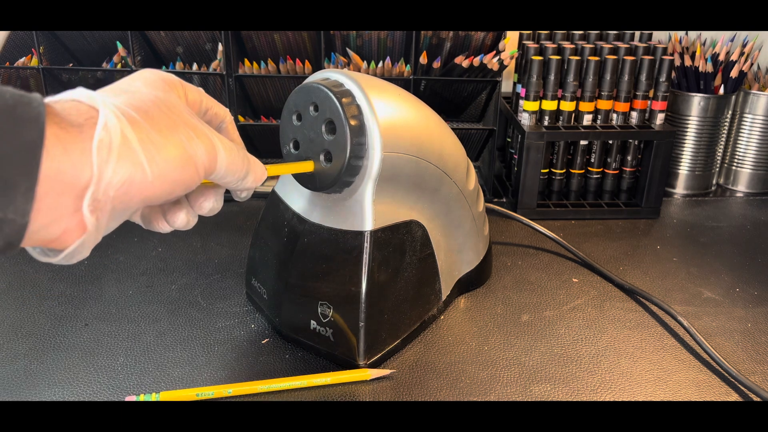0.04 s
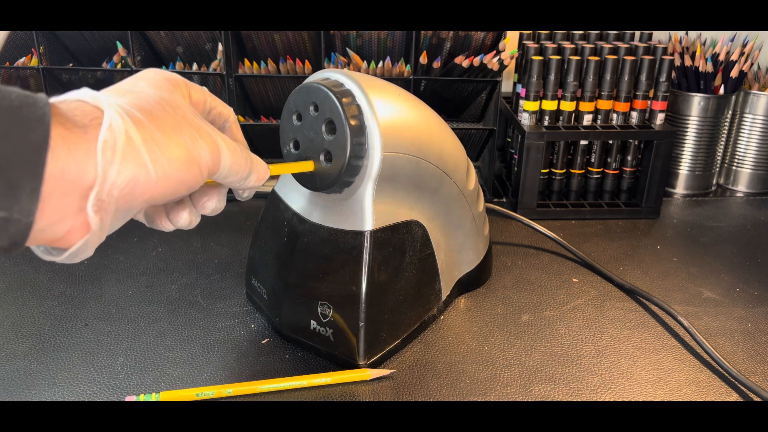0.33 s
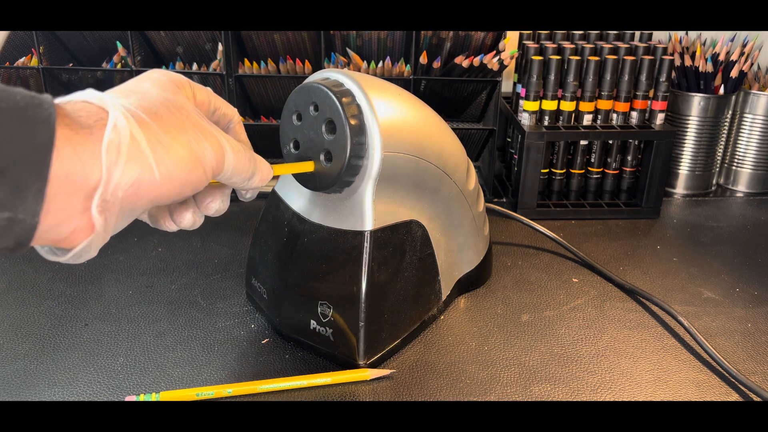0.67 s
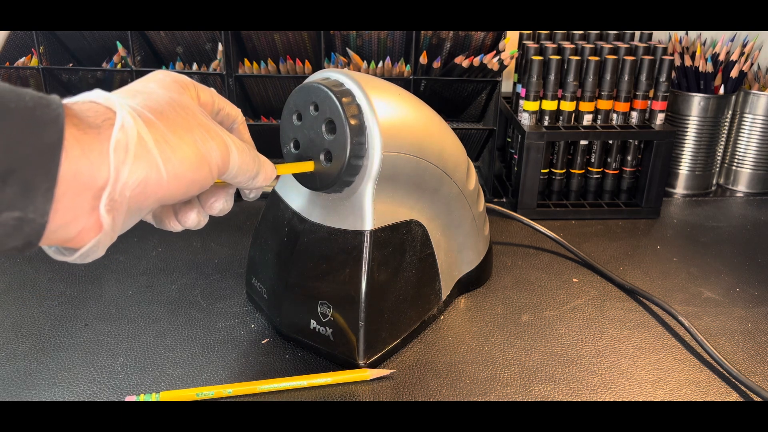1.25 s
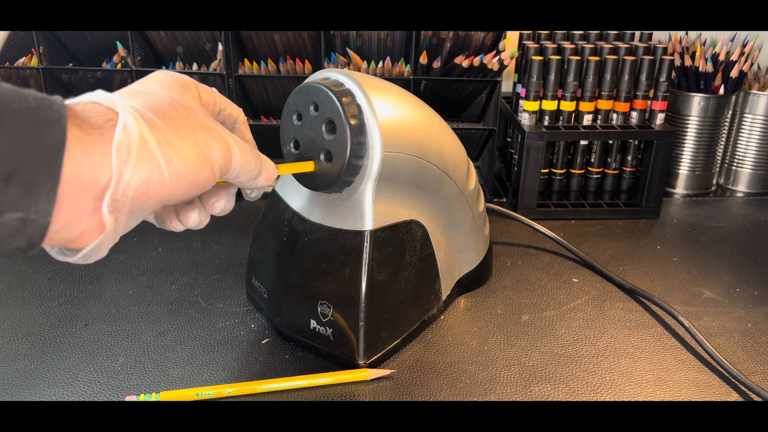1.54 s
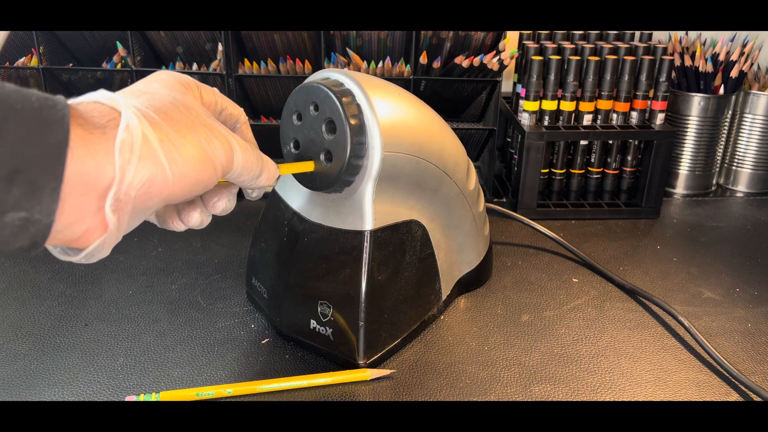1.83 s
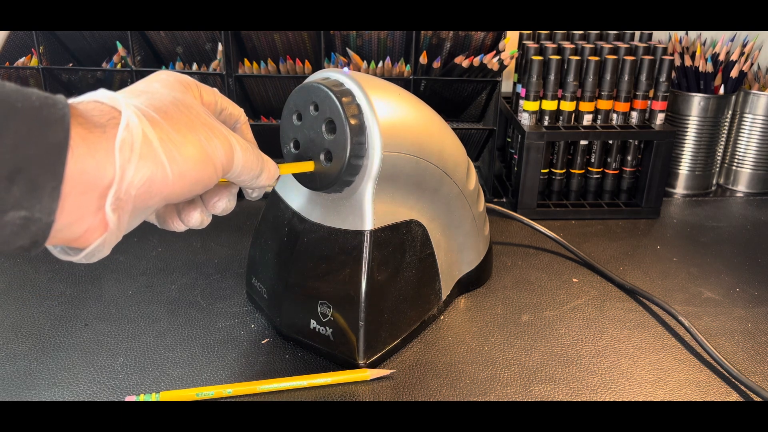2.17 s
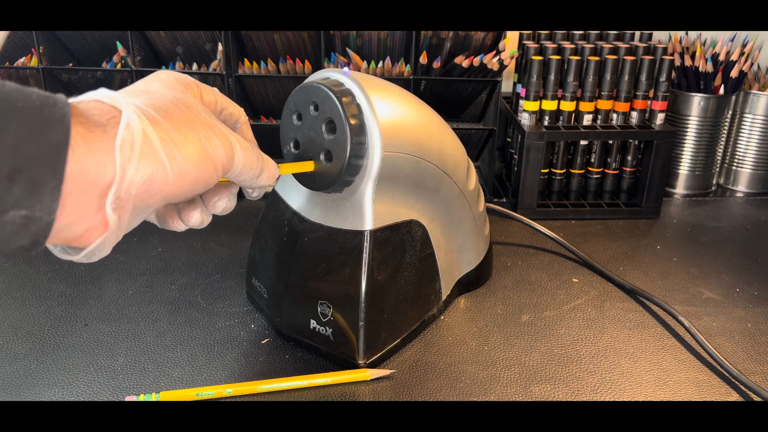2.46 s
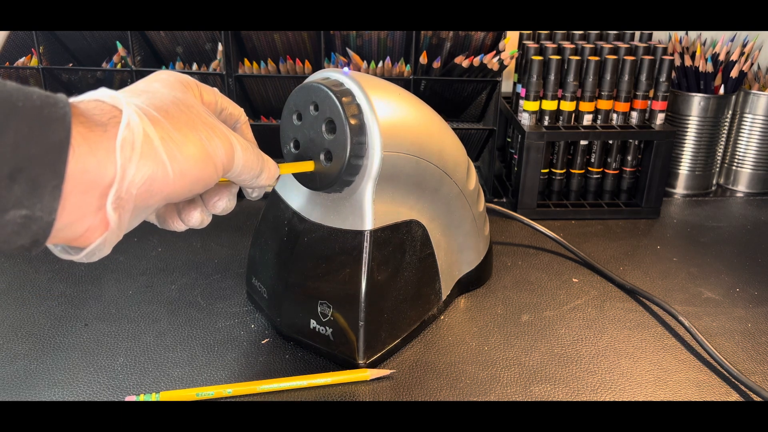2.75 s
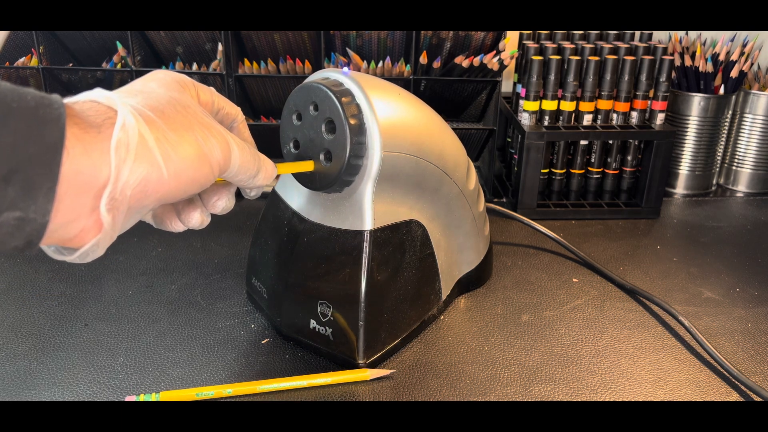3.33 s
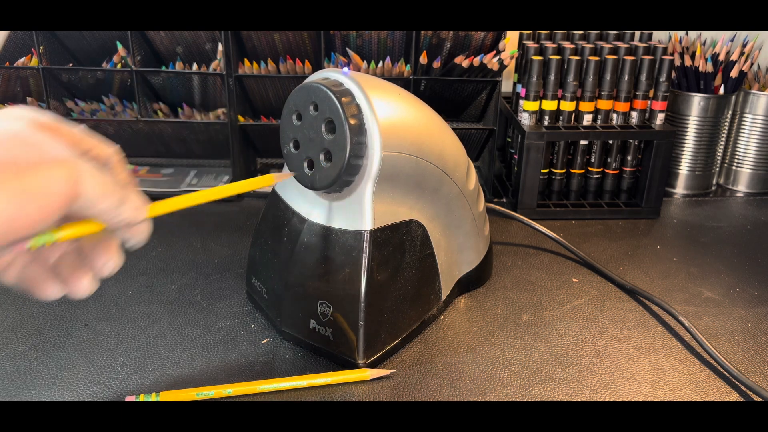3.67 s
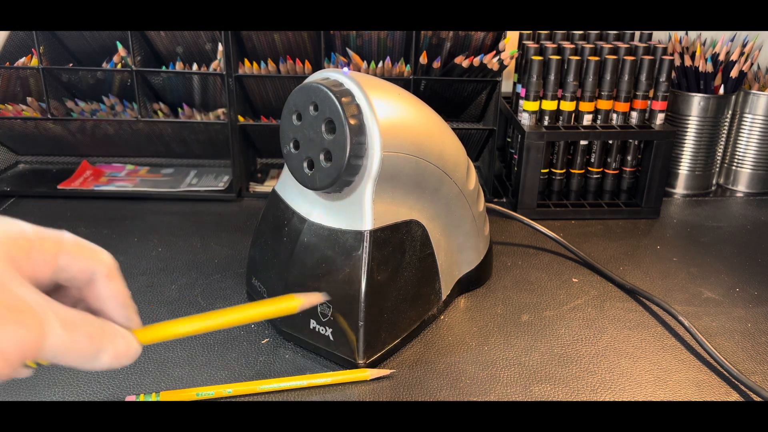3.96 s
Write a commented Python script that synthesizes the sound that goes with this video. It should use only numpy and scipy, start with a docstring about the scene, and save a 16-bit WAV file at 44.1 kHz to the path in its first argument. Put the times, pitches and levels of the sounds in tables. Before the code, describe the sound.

An electric pencil sharpener grinds a pencil from the start, loud and rasping, with crunches and splintering snaps through the first second. The cutting lightens, and from about 1.7 seconds mostly gear whine, rattle and motor hum remain. The motor stops near 2.9 seconds. Around 3.3 to 3.6 seconds the pencil slides out with light plastic clicks and knocks, followed by a faint swish of the hand in the quiet room.

```python
"""On a desk in a quiet room, an electric pencil sharpener grinds a pencil. The circling cutter bites hard,
tearing chips and splinters that ring its steel and the plastic shell, then shaves ever more lightly until
mostly the rattle and whine of the gears and the hum of the motor remain. The motor stops; the pencil
knocks in the plastic guide and slides out, and the hand draws back with a soft swish."""
import sys
import numpy as np
from scipy import signal
from scipy.fft import rfft, irfft
from scipy.io import wavfile

SR = 44100
rng = np.random.default_rng(int(sys.argv[2]) if len(sys.argv) > 2 else 0)


def wav_record(signal):
    """Record a signal, one row per channel, as 16-bit PCM in the file named by sys.argv[1]."""
    frames = np.transpose(np.atleast_2d(signal))
    bounded = np.clip(frames, -1, 1)
    # unit amplitude maps onto the largest positive 16-bit level
    quanta = np.round(bounded * 32767).astype(np.int16)
    wavfile.write(sys.argv[1], SR, quanta)


N = 176400
T = np.arange(N) / SR

# Gear teeth meshing, flatter under load. Each row: time in seconds, pitch in Hz.
MESH_PITCH = [(0, 590.7), (1.0, 592), (1.6, 600.8), (1.8, 614), (2.05, 614.2), (2.3, 615), (2.7, 618.2),
              (2.9, 623.4)]
# The gears' tones. Each row: harmonic number, relative level in dB, change in dB a second as they ease.
WHINE_PARTIALS = [(1, -38, -8), (2, -42.5, 2.5), (3, -59, 1)]
# Steady cutting, set by the push on the pencil. Each row: time in seconds, rasp and hiss in dB.
PUSH = [(0, -16.5, -28), (.5, -22.5, -30), (.595, -26, -33.5), (.74, -21.5, -27.5), (.87, -32, -31.5),
        (1.005, -30, -33), (1.06, -19.5, -27), (1.15, -28.5, -35), (1.27, -31.5, -36), (1.4, -27.5, -37),
        (1.62, -33, -36), (1.7, -37.5, -44), (2.4, -42.5, -46.5), (2.78, -39, -47.5), (2.87, -45, -72),
        (2.95, -100, -100)]
# The blades dig in. Each row: start and length in seconds, then rasp, hiss and crunch in dB.
BLADE_BITES = [(0.103, 0.013, -18.5, -33, -17), (0.147, 0.015, -14, -21, -20),
               (0.286, 0.023, -14, -21.5, -28.5), (0.336, 0.0089, -15.5, -32.5, -28.5),
               (0.378, 0.013, -12, -28, -12), (0.425, 0.03, -18, -27, -34), (0.48, 0.0079, -15, -25, -19.5),
               (0.52, 0.053, -16.5, -25, -25.5), (0.607, 0.054, -13.5, -23, -21.5),
               (.768, 0.013, -11, -30.5, -16.5), (0.793, 0.011, -15.5, -29.5, -18.5),
               (0.893, 0.034, -13.5, -26.5, -26.5), (0.909, 0.067, -16.5, -23.5, -17),
               (1.011, .016, -14, -24, -24), (1.194, 0.037, -23, -32.5, -33),
               (1.287, 0.081, -22, -31.5, -33), (1.421, 0.01, -22.5, -30, -36.5),
               (1.455, 0.045, -23, -29, -40), (1.527, 0.017, -23.5, -33, -35),
               (1.56, 0.062, -20.5, -31.5, -33.5)]
# Dry splinters break off. Each row: start in seconds, level in dB.
SPLINTER_SNAPS = [(0.047, -24), (0.092, -11.5), (.102, -17.5), (.125, -23.5), (0.161, -20), (.387, -17.5),
                  (.488, -23.5), (.627, -18), (.772, -18.5), (0.916, -22), (1.015, -24.5)]
# The blades graze the retreating tip. Each row: peak time in seconds, pitch in Hz, level in dB.
TIP_SQUEAKS = [(2.803, 3750, -42), (2.863, 3570, -41.5)]
# The pencil hits the guide. Each row: start in seconds, relative ring level in dB,
# favoured pitch in Hz, relative tick level in dB.
PENCIL_KNOCKS = [(3.311, -60, 990, -36.5), (3.352, -35, 1097, -56), (3.358, -41, 1000, -62),
                 (3.464, -44, 700, -70), (3.504, -34.5, 720, -50), (3.525, -33.5, 720, -57),
                 (3.536, -36, 700, -62), (3.548, -40, 900, -39), (3.558, -30, 1540, -18.5),
                 (3.566, -33.5, 1110, -31), (3.572, -29.5, 750, -42), (3.583, -38.5, 650, -38),
                 (3.741, -80, 990, -55)]

# Fader moves. Each row: time in seconds, level in dB.
GEAR_DRIVE = [(0, 5), (1.7, -0.5), (2.3, -1), (2.77, -3), (2.81, -11), (2.87, -10), (2.91, -21), (3.0, -74)]
BLADE_DRUMMING = [(0, -28.5), (.8, -27.5), (1.0, -31.5), (1.64, -31), (1.71, -40.5), (2.75, -80),
                  (2.92, -46), (3.0, -100)]
DESK_SHAKE = [(0, -26), (.65, -26), (.85, -37.5), (.95, -27.5), (1.1, -34), (1.6, -43), (1.72, -55),
              (2.8, -49), (2.91, -37), (2.95, -51), (3.07, -77)]
PENCIL_RUB = [(3.25, -92), (3.33, -66), (3.42, -72.5), (3.51, -65.5), (3.57, -49), (3.61, -54), (3.68, -83),
              (3.78, -84)]

# Tone colours of the noise layers. Each row: frequency in Hz, relative level in dB.
RASP_EQ = [(60, -27.5), (125, -1.5), (175, -7.5), (260, -2.5), (390, -0.5), (500, -8), (640, -1.5),
           (1000, -4.5), (1250, -8), (1520, -8), (2050, -6), (2620, -14), (3300, -15.5), (4000, -19),
           (6000, -24.5), (9000, -36.5), (15500, -42)]
HISS_EQ = [(1500, -28), (3300, 0.5), (4500, -2), (6000, -1.5), (6700, -2), (8500, -0.5), (11500, -4.5),
           (15500, -15)]
RATTLE_EQ = [(35, -50.5), (60, -24), (112, -6.5), (163, -15), (220, 1.5), (533, -7), (613, 0.5),
             (688, -1.5), (1200, -5.5), (1900, -8.5), (2800, -19), (3420, -19), (8280, -40), (11700, -37),
             (15500, -44)]
SHAVINGS_EQ = [(1500, -17), (3000, -4.5), (4200, 0.5), (6000, -2.5), (6600, -5.5), (8000, 0.5),
               (11500, -5.5), (15500, -13.5)]
SNAP_EQ = [(2000, -20.5), (4000, 6.5), (6000, -2), (8800, 3), (11500, -10), (15500, -15.5)]
RUB_EQ = [(300, -11.5), (480, -3.5), (700, -3.5), (1100, -10), (2000, -13.5), (8000, -24.5), (15000, -43.5)]
TICK_EQ = [(350, -34), (600, -11), (1600, 6), (3500, -2), (6000, -1.5), (8500, 1), (11000, -12),
           (15500, -17)]
SWISH_EQ = [(590, -59), (1000, -33), (1910, -24), (2420, -22), (4260, -4), (5600, -14), (9320, -15),
            (13900, -33), (15000, -24)]
ROOM_TONE_EQ = [(20, -5.5), (42, 14.5), (65, 3.5), (130, 1.5), (250, -1), (500, -15), (1200, -31.5),
                (1750, -24), (2500, -36.5), (7000, -35), (10000, -46), (15500, -49)]

# Resonances of the plastic shell and the steel cutter. Each row: pitch and width in Hz, level in dB.
SHELL_MODES = [(430, 110, -7.5), (714, 31, -4), (755, 32, -2), (942, 55, 6.5), (990.5, 45, 1.5),
               (1429, 27, -4.5), (1656, 47, -1.5), (1718, 16, -2), (1866, 50, -8.5), (2453, 60, -8),
               (2725, 62, -4), (3296, 93, -4.5), (4000, 41, -16.5)]
STEEL_MODES = [(3343, 130, 2.5), (3484, 97, 4.5), (3670, 38, -4.5), (4700, 100, -5.5), (4924, 130, -7),
               (5540, 110, -5.5), (5880, 150, 0), (7670, 270, -7.5), (8315, 110, -8)]
# Resonances of the guide. Each row: pitch in Hz, relative level in dB, seconds to fall by 60 dB.
GUIDE_MODES = [(493, -5, 0.043), (605, -8.5, 0.18), (655, -5.5, 0.037), (777, -7, 0.075),
               (976, -3.5, 0.073), (1320, -4, 0.033), (1640, -4.5, 0.036), (2054, -6, 0.044),
               (3335, 4, .04)]
# Paths inside the shell. Each entry: delay in seconds.
SHELL_PATHS = [.0003, .0007, .0013]
# Gaps in the treble. Each row: centre and width in Hz.
TREBLE_GAPS = [(10180, 980), (13800, 630)]

TEETH, START_TURN, STROKES_PER_TOOTH = 78, 0.31, 0.36


def from_db(db):
    """Decibels to gain."""
    return 10 ** (np.asarray(db) / 20)


def rms_one(x):
    """Scale to unit level."""
    return x / np.sqrt(np.mean(x ** 2) + 1e-20)


def in_time(rows):
    """Each column of a curve, at every sample."""
    s, *columns = np.transpose(rows)
    return [np.interp(T, s, c) for c in columns]


def drift(hz):
    """A smooth random wander of unit level, mostly slower than hz."""
    r = np.exp(-80 * np.pi * hz / SR)
    slow = signal.lfilter([1], [1, -2 * r, r * r], rng.standard_normal(N // 40 + 2002))[2000:]
    return np.interp(np.arange(N) / 40, np.arange(len(slow)), rms_one(slow))


def colour(x, eq, size=8192):
    """Minimum-phase EQ that keeps the power of white noise."""
    hz, db = np.transpose(eq)
    f = np.maximum(np.arange(size // 2 + 1) * SR / size, 1)
    gain = from_db(np.interp(np.log(f), np.log(hz), db)) / np.sqrt(1 + (.5 * hz[0] / f) ** 4)
    cepstrum = irfft(np.log(rms_one(gain)))
    cepstrum[1:size // 2] *= 2
    cepstrum[size // 2 + 1:] = 0
    return signal.fftconvolve(x, irfft(np.exp(rfft(cepstrum))))[:N]


def resonate(x, hz, width_hz):
    """One resonance with gain 1 at its peak."""
    r, w = np.exp(-np.pi * width_hz / SR), 2 * np.pi * hz / SR
    return signal.lfilter(np.array([1, 0, -1]) * (1 - r * r) / 2, [1, -2 * r * np.cos(w), r * r], x)


def narrow(x, hz, width_hz):
    """A steep-sided band of the input, at unit level."""
    return rms_one(resonate(resonate(x, hz, width_hz), hz, width_hz))


def body(x, modes):
    """A part rings with what strikes it, at the level of the input."""
    return x.std() * rms_one(sum(from_db(db) * resonate(x, hz, width) for hz, width, db in modes))


def ring(clicks, hz, t60):
    """A unit click sets a sine of height 1 ringing."""
    r, w = 1000 ** (-1 / (t60 * SR)), 2 * np.pi * hz / SR
    return signal.lfilter([0, np.sin(w)], [1, -2 * r * np.cos(w), r * r], clicks + 1e-18)


def grains(per_s, spread_db):
    """Random clicks of uneven size, at unit level."""
    sizes = from_db(spread_db * np.minimum(rng.exponential(1, N), 4)) * rng.choice([-1, 1], N)
    return rms_one(sizes * (rng.random(N) < per_s / SR))


def swell(cycles, depth, lag=0):
    """A level that rises once in each cycle."""
    return rms_one(np.exp(depth * np.cos(2 * np.pi * (cycles - lag))))


def bursts(hits, decay_s):
    """A sharp, dying burst of noise for each pair of start in seconds and level in dB."""
    level = sum(from_db(db) * (T >= s) * np.exp(-np.clip(T - s, 0, .5) / decay_s) for s, db in hits)
    return level * rng.standard_normal(N)


def cutting(mesh, turns):
    """Blades tear chips from the wood, in bursts where they dig in; shell and cutter ring along."""
    rasp, hiss = from_db(in_time(PUSH))
    rasp_power = (rasp * swell(turns, depth=0.28)) ** 2
    hiss_power = (hiss * swell(turns, depth=0.11, lag=0.036)) ** 2
    attack_s, release_s, sag_db_per_s = 0.0033, 0.006, 63
    bite_power = crunch = 0
    for start, length, rasp_db, hiss_db, crunch_db in BLADE_BITES:
        age = np.maximum(T - start, 0)
        shape = np.minimum(age / attack_s, 1) * from_db(-sag_db_per_s * age)
        shape *= np.exp(-np.clip(age - length, 0, .5) / release_s)
        bite_power += (from_db(rasp_db) * shape) ** 2
        hiss_power += (from_db(hiss_db) * shape) ** 2
        crunch += from_db(crunch_db) * shape
    strokes = swell(mesh * STROKES_PER_TOOTH + 0.14 * drift(25), depth=0.23)
    chips = grains(per_s=5000, spread_db=2.5) * strokes * np.sqrt(rasp_power + bite_power)
    # Hard bites shake the shell more and favour its middle resonances.
    jolts = grains(per_s=2800, spread_db=2.5) * strokes
    jolts *= np.sqrt(rasp_power + from_db(3) ** 2 * bite_power)
    cracks = body(grains(per_s=1200, spread_db=0.5) * strokes * crunch, [(1630, 550, 0)])
    splinters = grains(per_s=2200, spread_db=1.5) * strokes * np.sqrt(hiss_power)
    splinters *= from_db(0.96 * drift(70))
    wood = from_db(-3.5) * colour(chips, RASP_EQ) + from_db(-5.5) * colour(splinters, HISS_EQ)
    shell = from_db(-10) * body(jolts, SHELL_MODES) + from_db(-3) * body(cracks, SHELL_MODES)
    return wood + shell + from_db(-8.5) * body(splinters, STEEL_MODES)


def gear_rattle(mesh, turns, drive):
    """Loose teeth clatter as they mesh and faintly ring the shell."""
    pulse = swell(mesh, depth=0.49) * swell(2 * turns, depth=0.14)
    clatter = drive * pulse * grains(per_s=4000, spread_db=2.5) * from_db(2.4 * drift(90))
    return from_db(-32) * (colour(clatter, RATTLE_EQ) + from_db(-20) * body(clatter, SHELL_MODES))


def shell_scatter(x, feedback=0.54):
    """Very short echoes inside the shell smear each click without colouring it."""
    for delay_s in SHELL_PATHS:
        allpass = np.r_[1, np.zeros(int(delay_s * SR)), feedback]
        x = signal.lfilter(allpass[::-1], allpass, x)
    return x


def gear_whine(mesh, drive, ease_at_s=2.5):
    """The mesh tone and its overtones sing when the gears run free; under load they blur and weaken."""
    load = from_db(in_time(PUSH)[0] - PUSH[0][1])
    phase = 2 * np.pi * (mesh + (.014 + .16 * load) * drift(25))
    eased_s = np.clip(T - ease_at_s, 0, .5)
    tones = 0
    for harmonic, db, db_per_s in WHINE_PARTIALS:
        flutter_db = 3 / harmonic * drift(20)
        tones += from_db(db + db_per_s * eased_s + flutter_db) * np.sin(harmonic * phase)
    return np.sqrt(2) * drive * from_db(-7 * load) * tones


def motor(mesh, turns, hum_hz=118.2, off_at_s=2.875, fade_db_per_s=282, rocks_per_s=6.5):
    """Hum throbs once a turn, the blades drum twice a turn, the labouring machine rocks on the desk."""
    running = from_db(-fade_db_per_s * np.maximum(T - off_at_s, 0))
    hum = from_db(-40.5) * running * swell(turns, depth=0.62, lag=0.16)
    hum *= np.sin(2 * np.pi * (hum_hz * T + 0.14 * drift(23)))
    drum = from_db(in_time(BLADE_DRUMMING)[0]) * swell(2 * turns, depth=0.33, lag=0.39)
    drum *= np.sin(2 * np.pi * (STROKES_PER_TOOTH * mesh + .15 * drift(9)))
    desk = from_db(in_time(DESK_SHAKE)[0]) * swell(rocks_per_s * (T - 0.17), depth=0.52)
    desk *= narrow(rng.standard_normal(N), hz=134.1, width_hz=56)
    return np.sqrt(2) * (hum + drum) + desk


def spinning_cutter(turns, drive):
    """The steel rings as it sweeps loose shavings once a turn; the blades clink against their holder."""
    sweep = swell(turns, depth=1.1, lag=-0.022)
    shavings = from_db(-51) * drive * sweep * grains(per_s=9900, spread_db=6)
    clinks = from_db(-52) * drive * narrow(grains(per_s=70, spread_db=3.5), hz=3560, width_hz=220)
    return colour(shavings, SHAVINGS_EQ) + from_db(-2) * body(shavings, STEEL_MODES) + clinks


def snaps():
    """Short bright cracks of splitting wood, which also knock the shell."""
    cracks = bursts(SPLINTER_SNAPS, decay_s=0.002)
    return colour(cracks, SNAP_EQ) + from_db(-2.5) * body(cracks, SHELL_MODES)


def squeaks(width_s=0.0041):
    """Two tiny squeaks as the blades graze the retreating tip."""
    out = 0
    for s, hz, db in TIP_SQUEAKS:
        level = from_db(db) * np.exp(-((T - s) / width_s) ** 2)
        out += level * narrow(rng.standard_normal(N), hz, width_hz=330)
    return out


def pencil_rub():
    """Fine grains of friction as the pencil slides along the guide."""
    return colour(from_db(in_time(PENCIL_RUB)[0]) * grains(per_s=2500, spread_db=2), RUB_EQ)


def pencil_knocks(falloff_db_per_octave=15):
    """Each knock rings the guide around a favoured pitch, with a tick and a thin metal ping."""
    starts, ring_db, favoured_hz, tick_db = np.transpose(PENCIL_KNOCKS)
    guide = 0
    for hz, mode_db, t60 in GUIDE_MODES:
        hit_db = ring_db + mode_db - 3.5 - falloff_db_per_octave * abs(np.log2(hz / favoured_hz))
        hit_db += rng.normal(0, 1, len(starts))
        clicks = np.zeros(N)
        clicks[(starts * SR).astype(int)] = from_db(hit_db) * rng.choice([-1, 1], len(starts))
        guide += ring(clicks, hz, t60)
    ticks = colour(bursts(zip(starts, tick_db - 16), decay_s=0.007), TICK_EQ)
    ping = from_db(-17) * ticks.std() * rms_one(resonate(ticks, hz=8400, width_hz=29))
    return guide + ticks + ping


def hand_swish(peak_s=3.85, width_s=0.061):
    """A soft breath of noise as the hand draws back."""
    level = from_db(-62.5) * np.exp(-((T - peak_s) / width_s) ** 2)
    return colour(level * rng.standard_normal(N), SWISH_EQ)


def room(x, t60=0.31):
    """Dense reflections add a short, dull tail."""
    t = T[:SR // 2]
    tail = rng.standard_normal(len(t)) * 1000 ** (-t / t60) * (t > .001)
    echoes = signal.fftconvolve(x, tail / np.sqrt(np.sum(tail ** 2)))[:N]
    dull = signal.butter(1, 5970, fs=SR, output="sos")
    return x + from_db(-12.5) * signal.sosfilt(dull, echoes)


def scene():
    """One shaft drives gears and cutter; the noises get the room's tail, whine and motor stay dry."""
    mesh = np.cumsum(in_time(MESH_PITCH)[0]) / SR  # teeth passed so far
    turns = mesh / TEETH + START_TURN
    drive = from_db(in_time(GEAR_DRIVE)[0])
    noises = shell_scatter(cutting(mesh, turns) + gear_rattle(mesh, turns, drive))
    noises += snaps() + spinning_cutter(turns, drive) + squeaks()
    noises += pencil_knocks() + pencil_rub() + hand_swish()
    room_tone = from_db(-67.5) * colour(rng.standard_normal(N), ROOM_TONE_EQ)
    return (room(noises) + gear_whine(mesh, drive) + motor(mesh, turns) + room_tone)[None]


def record(dry):
    """Two narrow gaps in the treble, each notched twice, and a steep cut at the very top."""
    for hz, width_hz in TREBLE_GAPS:
        b, a = signal.iirnotch(hz, hz / width_hz, fs=SR)
        dry = signal.lfilter(b, a, signal.lfilter(b, a, dry))
    return signal.sosfilt(signal.cheby2(20, 70, 16500, fs=SR, output="sos"), dry)


dry = scene()
out = record(dry)
wav_record(out)
```